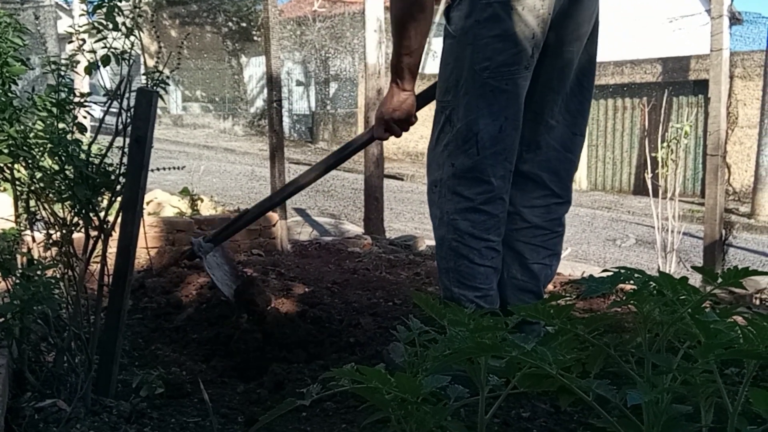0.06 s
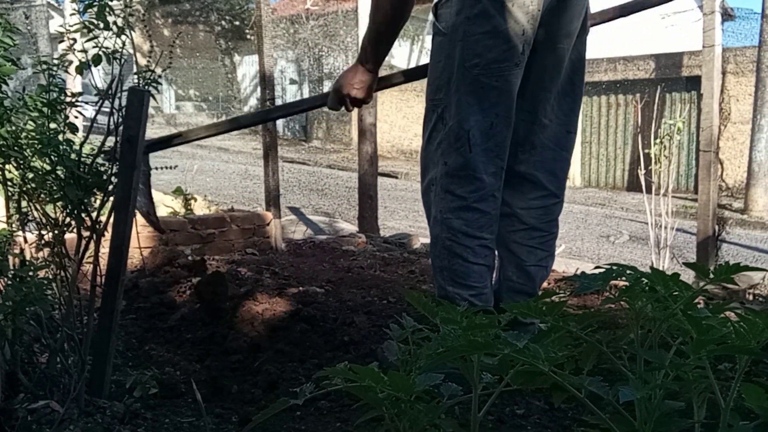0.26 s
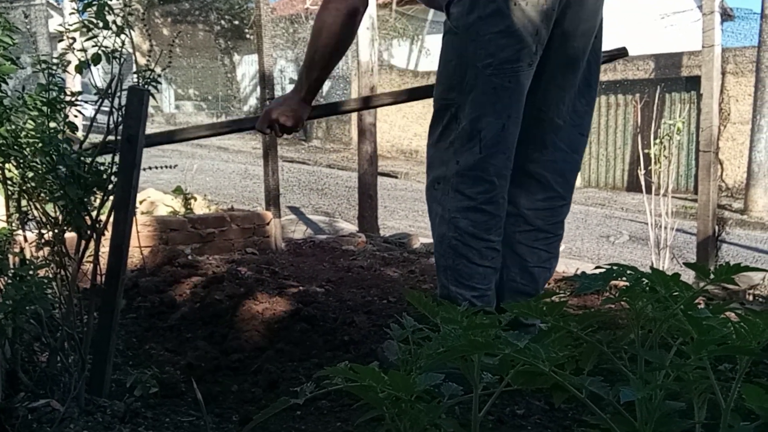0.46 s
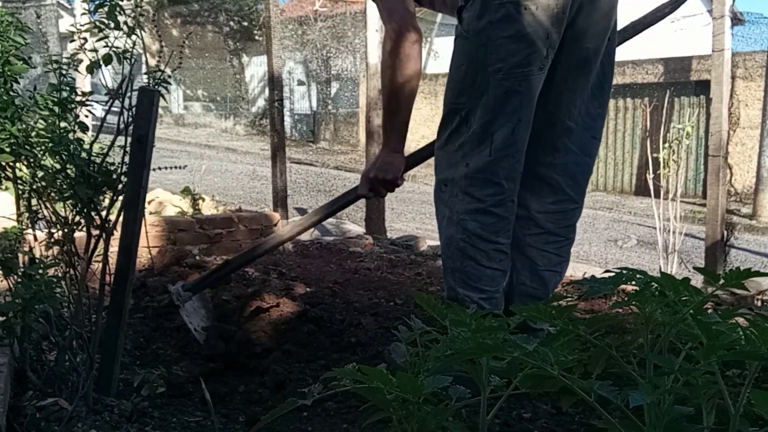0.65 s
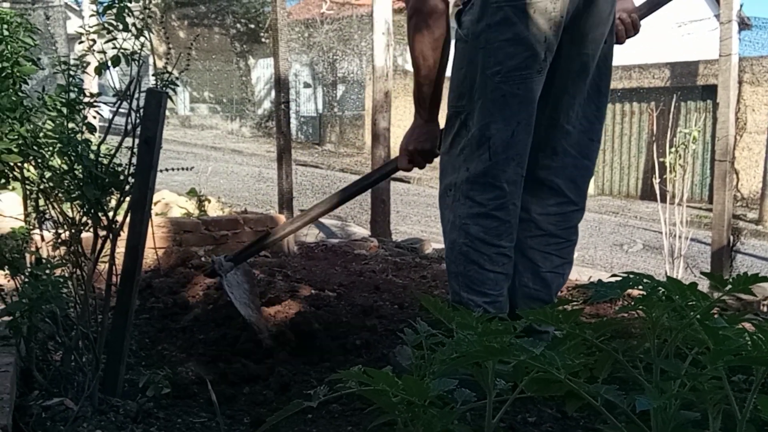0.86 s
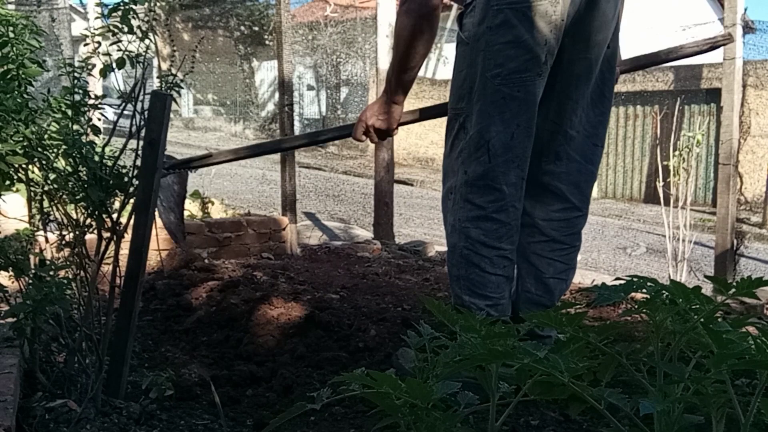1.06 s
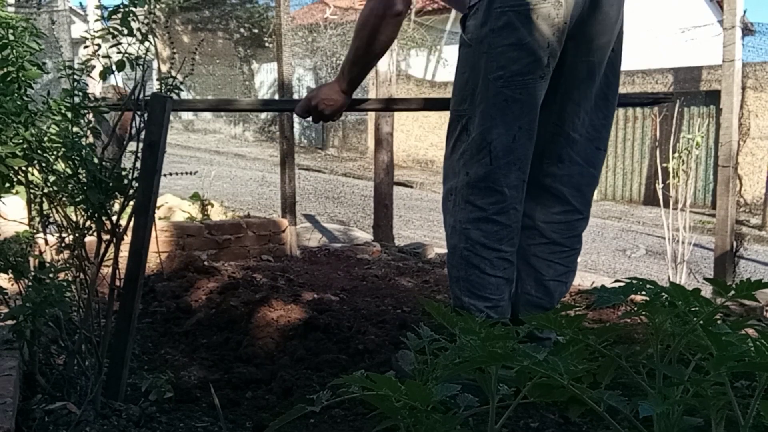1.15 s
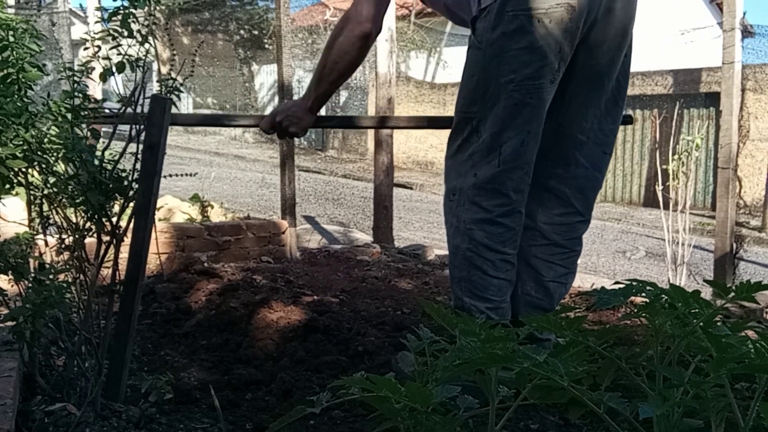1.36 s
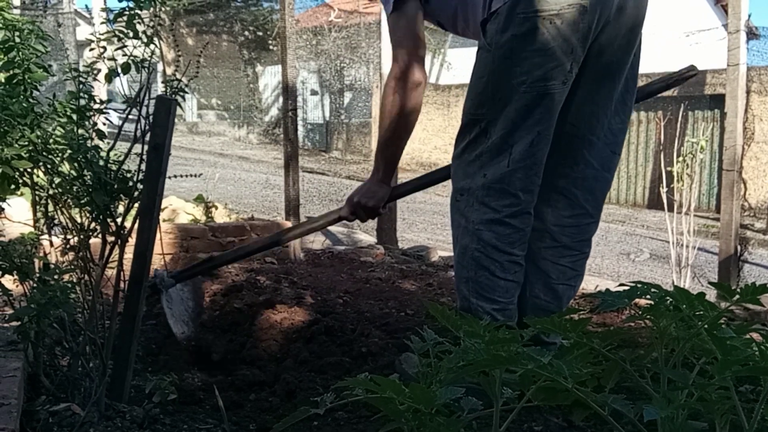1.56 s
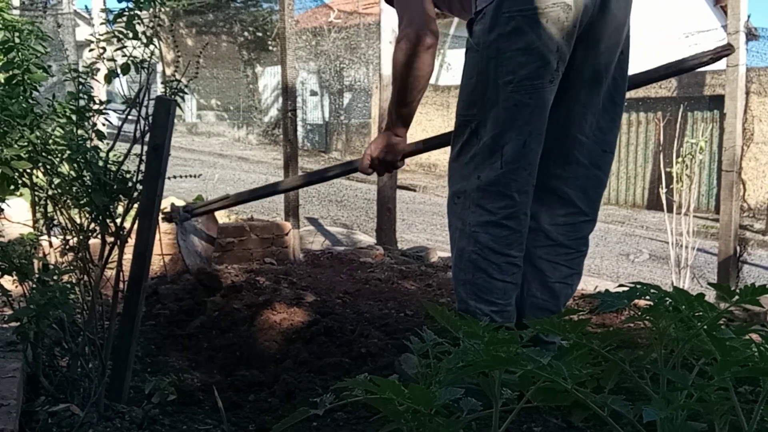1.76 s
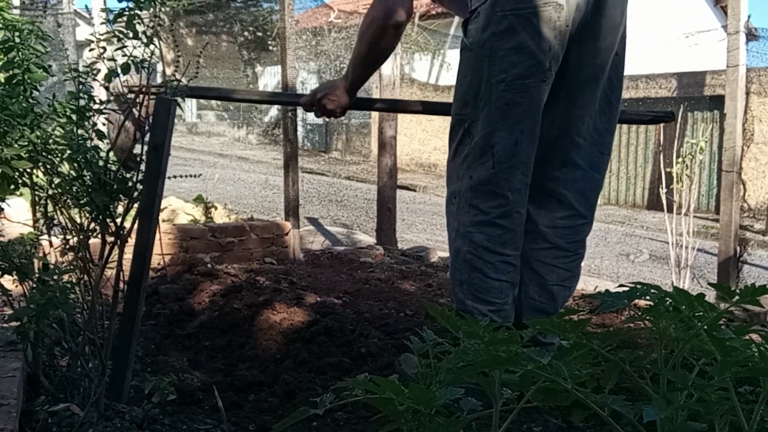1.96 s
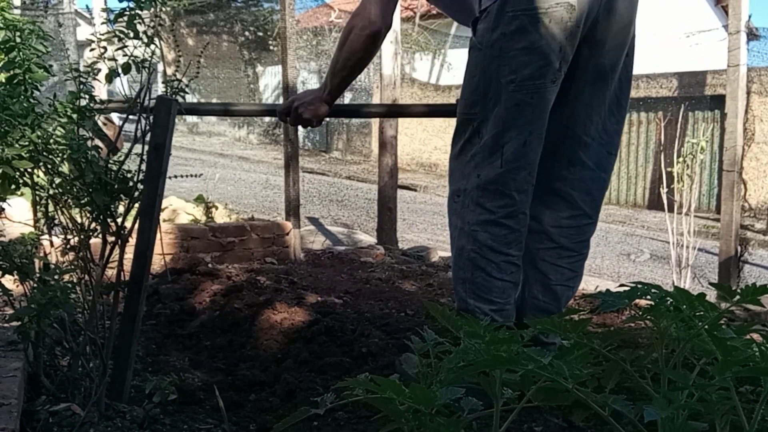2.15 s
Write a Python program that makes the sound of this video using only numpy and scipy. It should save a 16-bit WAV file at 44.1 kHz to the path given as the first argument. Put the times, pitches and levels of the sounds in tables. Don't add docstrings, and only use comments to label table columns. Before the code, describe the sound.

Close outdoor stereo of a steel hoe striking moist earth three times at a steady pace; stones click on metal, soil patters back, hands slide on wood, and low distant traffic rumbles quietly behind.

```python
import sys
import numpy as np
from scipy import signal
from scipy.fft import rfft, irfft
from scipy.io import wavfile
from scipy.ndimage import uniform_filter1d

SR = 44100
rng = np.random.default_rng(int(sys.argv[2]) if len(sys.argv) > 2 else 0)


def int16_out(signal):
    q = np.round(np.clip(np.atleast_2d(signal).T, -1, 1) * 32767)
    wavfile.write(sys.argv[1], SR, q.astype(np.int16))


def voltage_ratio(level):
    return 10 ** (np.asarray(level, float) / 20)


N = 97020
T = np.arange(N) / SR

# time in seconds, level in dB.
CHOP_FORCE = [
    [(.218, -53), (.224, -25), (.231, -31), (.2335, -17), (.248, -29.5), (.253, -27), (.257, -22.5),
     (.268, -37.5), (.31, -57)],
    [(1.0772, -55), (1.0788, -18.5), (1.087, -27), (1.098, -25), (1.112, -37.5), (1.13, -44.5), (1.16, -57),
     (1.2, -77)],
    [(1.9254, -26), (1.9268, -24.5), (1.938, -29), (1.943, -37), (1.958, -37.5), (1.962, -35.5),
     (1.972, -48), (2.0, -56.5)],
]
EARTH_WEIGHT_DB = [-0.5, 2.5, -2]
BLADE_RING_DB = [-13, -11.5, -23]
# frequency in Hz, level in dB.
GRIT_TONE = [(300, -30), (1500, -16.5), (3300, -12.5), (5300, -8), (6800, -2.5), (8600, -8.5), (13600, -29),
             (15200, -14)]
EARTH_TONE = [(150, -40), (300, -18), (500, -9.5), (1000, -4.5), (1500, -1), (2300, 0.5), (3500, -0.5),
              (6000, -22)]
# frequency in Hz, width in Hz, level in dB.
BLADE_MODES = [(2300, 350, -11.5), (3390, 300, -5), (3850, 290, -15), (4630, 530, -11), (6600, 400, -0.5),
               (7225, 500, -2), (8000, 720, -4.5), (10600, 700, -10)]
# start in seconds, hold in seconds, level in dB, fade in dB per second,
# dull clods in dB relative to the fine crumbs.
CRUMB_FALLS = [(-.02, 0.088, -68, 161, -4.5), (0.229, 0.01, -31, 119, -8), (0.435, 0.04, -56, 200, -36),
               (1.116, 0.01, -43, 169, -10), (1.244, 0.047, -67.5, 310.5, -11),
               (1.478, 0.22, -70, 209, -11), (1.872, 0.036, -61, 456, -2.5),
               (1.949, 0.088, -58.5, 128, -29), (2.118, 0.018, -64, 214, -14.5)]
# frequency in Hz, level in dB.
CRUMB_TONE = [(600, -21), (1500, -9.5), (2500, 1.5), (4500, -1), (7500, 1.5), (9300, -13.5), (13600, -33),
              (15300, -30)]
# start in seconds, peak in dB, pitch in Hz.
STONE_TICKS = [(0.231, -22.5, 6600), (0.2324, -14.5, 6270), (.2337, -12.5, 7900), (0.2322, -16.5, 4900),
               (0.239, -18.5, 6200), (.2400, -18, 4850), (.2440, -20.5, 7050), (0.2555, -18.5, 6640),
               (0.2637, -25, 7200), (0.278, -27.5, 6400), (0.44, -43, 4400), (.4595, -38, 4900),
               (.4610, -40, 7000), (.4640, -48, 9500), (.4670, -42, 5800), (0.479, -45, 2540),
               (0.509, -46, 5500), (.5180, -48.5, 6900), (1.0786, -16, 6600), (1.0843, -17, 6860),
               (1.0863, -12.5, 7100), (1.0920, -19, 3240), (1.0968, -15.5, 6480), (1.8850, -46.5, 7560),
               (1.9257, -15, 6890), (1.9303, -11.5, 7230), (1.9341, -12.5, 7560), (1.9263, -19, 9910),
               (1.937, -27, 6360), (1.9600, -39, 10280), (1.9620, -28, 7600), (2.0750, -56.5, 5920),
               (2.1240, -51, 9200), (1.8770, -50, 6000)]
# start in seconds, peak in dB, pitch in Hz, 60 dB decay in seconds.
CLOD_KNOCKS = [(.240, -42.5, 241, 0.081), (.286, -33, 2120, 0.038), (.29, -52, 410, 0.76),
               (.592, -42.5, 232, 0.064), (.598, -54, 330, .05), (.597, -54.5, 745, 0.056),
               (.596, -48.5, 1047, 0.049), (.609, -48, 1080, .03), (.609, -56, 600, .03),
               (.63, -61, 1000, .05), (.617, -59, 1880, 0.049), (1.082, -35, 267, 0.09),
               (1.095, -39, 340, 0.12), (1.082, -36, 1030, .07), (1.144, -37.5, 1410, 0.089),
               (1.146, -39.5, 2300, 0.03), (1.884, -55, 2190, 0.07), (1.886, -52, 3450, .07),
               (1.928, -35, 1004, 0.058), (1.935, -38.5, 531, 0.064), (1.936, -44, 950, .03),
               (1.927, -37, 750, .06), (.274, -40, 1500, 0.026), (1.93, -42.5, 320, 0.086),
               (1.95, -34.5, 181, 0.051), (1.94, -29, 225, 0.06), (1.962, -37, 116, 0.1),
               (2.124, -48.5, 2420, 0.092), (2.1235, -32.5, 6500, 0.01), (2.1245, -39, 4400, 0.025),
               (.29, -50, 1350, .3)]
# start in seconds, length in seconds, level in dB, thin top band in dB.
HAND_SLIDES = [(0.026, 0.21, -52, -14), (0.586, 0.22, -53, -11), (1.535, 0.07, -60, -16),
               (1.75, 0.052, -65, -14), (2.125, 0.09, -57, -19.5)]
# frequency in Hz, width in Hz, level in dB.
HANDLE_BANDS = [(4270, 350, -2), (3900, 400, -9), (4950, 500, -16)]
# start in seconds, length in seconds, frequency in Hz,
# width in Hz, level in dB.
GRIP_SQUEAKS = [(.12, .08, 2800, 200, -66), (.71, .04, 2750, 200, -68), (.742, .04, 2780, 280, -58),
                (.742, .035, 2430, 200, -64), (.55, .05, 1700, 200, -67), (.74, .04, 3500, 500, -63),
                (.26, .135, 6800, 1200, -44), (.43, .11, 4000, 700, -56), (1.265, .07, 3300, 300, -59),
                (1.26, .08, 7150, 250, -64), (1.255, .085, 4300, 900, -58), (1.26, .05, 5900, 500, -65),
                (1.16, .06, 1550, 200, -60), (1.31, .04, 2200, 200, -66), (1.58, .12, 5100, 300, -71),
                (2.0, .09, 4550, 250, -65), (1.99, .06, 2950, 250, -65)]
# start in seconds, length in seconds, from Hz, to Hz, level in dB.
BIRD_WHISTLES = [(.70, .14, 6900, 7480, -75), (.895, .095, 7950, 7100, -76), (.985, .09, 6750, 5900, -73),
                 (1.0, .07, 6200, 5200, -78)]
# start in seconds, length in seconds, from Hz, to Hz, level in dB.
ENGINE_BOOMS = [(0.022, .11, 68, 82.5, -50.5), (0.363, 0.15, 84, 91.5, -47.5),
                (0.464, 0.075, 65, 64.6, -51.5), (0.525, 0.094, 95, 95, -53.5),
                (0.667, 0.056, 72, 65.4, -56.5), (0.924, .07, 84, 84, -53.5), (1.083, 0.073, 68, 67.4, -61),
                (1.235, 0.057, 68, 68, -58), (1.686, 0.064, 113, 126, -54.5), (1.707, 0.092, 84, 72, -50.5),
                (1.83, 0.09, 74, 91.3, -52), (2.142, 0.053, 80, 80.5, -51.5)]
# frequency in Hz, level in dB.
TOWN_TONE = [(25, -34.5), (45, -29), (65, 4), (120, -8), (160, -12.5), (260, -16.5), (400, -34),
             (1200, -55)]
AIR_TONE = [(120, -21.5), (300, -1), (1700, -5.5), (4500, -17.5), (7500, -20), (9300, -33.5), (13700, -38),
            (15300, -19)]
# time in seconds, level in dB.
TOWN_SWELL = [(0.0, -57.5), (0.16, -61.5), (0.45, -54.5), (0.84, -61), (1.14, -56.5), (1.42, -62),
              (1.8, -56.5), (2.02, -61.5), (2.2, -58)]
# frequency in Hz, share from 0 to 1.
MIC_LIKENESS = [(60, 1), (200, 0.36), (1000, 0.45), (8000, 0.12)]
# frequency in Hz, level in dB.
RIGHT_MIC_TONE = [(60, -3.5), (300, -3.5), (1300, -5), (2400, -10.5), (5000, -2), (8000, -12.5), (10500, 6),
                  (15000, -1.5)]

LEFT_LAG, FLOOR_LAG = 47, 19


def evened(x):
    return x / np.sqrt(np.mean(x ** 2) + 1e-20)


def drift(noise, *sizes_axes):
    for size, axis in sizes_axes:
        noise = uniform_filter1d(noise, size=size, axis=axis)
    return evened(noise)


def read(points, hz):
    f, value = np.transpose(points)
    return np.interp(np.log(hz + 1), np.log(f + 1), value)


def colour(x, points):
    log_gain = np.log(voltage_ratio(read(points, abs(np.fft.fftfreq(2048, 1 / SR)))))
    taps = np.fft.ifft(np.exp(np.conj(signal.hilbert(log_gain)))).real[:1024]
    return signal.oaconvolve(x, taps[None] / np.linalg.norm(taps), axes=1)[:, :N]


def resonate(x, hz, width, order=1):
    turn = np.exp(2j * np.pi * np.cumsum(hz * np.ones(x.shape[-1])) / SR)
    r = np.exp(-np.pi * width / SR)
    low = signal.lfilter([np.sqrt(2 - 2 * r * r)], [1, -r], x / turn)
    for _ in range(order - 1):
        low = signal.lfilter([np.sqrt(2) * (1 - r)], [1, -r], low)
    return (turn * low).real


def grains(per_s, spread_db):
    shared = 0.65
    size = voltage_ratio(spread_db * np.minimum(rng.exponential(1, N), 4)) * (rng.random(N) < per_s / SR)
    a, b = rng.standard_normal((2, N))
    return evened(size * np.array([a, shared * a + np.sqrt(1 - shared ** 2) * b]))


def add(mix, s, sound):
    part = mix[round(s * SR):][:len(sound)]
    part += sound[:len(part)]


def chops():
    earth_db, earth_lag_s = -6, 0.0037
    force = [np.interp(T, *np.transpose(c), left=-150, right=-150) for c in CHOP_FORCE]
    cracks = grains(18000, 1.6)
    grit = cracks * voltage_ratio(force).sum(0)
    struck = cracks * sum(voltage_ratio(f + db) for f, db in zip(force, BLADE_RING_DB))
    ring = sum(voltage_ratio(db) * resonate(struck, hz, w, order=2) for hz, w, db in BLADE_MODES)
    push = sum(voltage_ratio(f + db) for f, db in zip(force, EARTH_WEIGHT_DB))
    push = signal.lfilter([1], [1, -np.exp(-1 / (earth_lag_s * SR))], push) / (earth_lag_s * SR)
    earth = colour(push * grains(2300, 1.2), EARTH_TONE)
    return colour(grit, GRIT_TONE) + ring + voltage_ratio(earth_db) * earth


def crumbs():
    rise, clump_db, patch_db = 0.3, 1.4, 2.2
    fine = clods = 0
    for s, hold, db, fade, clod_db in CRUMB_FALLS:
        level = np.clip((T - s) / (rise * hold), 0, 1) * voltage_ratio(db - fade * np.maximum(T - s - hold, 0))
        fine, clods = fine + level, clods + voltage_ratio(clod_db) * level
    clumps = drift(rng.standard_normal(N), (200, 0), (200, 0))
    fine = fine * voltage_ratio(clump_db * clumps) * grains(12000, 2.1)
    patter = colour(fine, CRUMB_TONE) + colour(clods * grains(5000, 2.1), EARTH_TONE)
    z = signal.stft(patter, nperseg=256, noverlap=192)[2]
    patches = drift(rng.standard_normal(z.shape[1:]), (4, 0), (10, 1))
    return signal.istft(z * voltage_ratio(patch_db * patches), nperseg=256, noverlap=192)[1][:, :N]


def stones():
    decay_s, rattle_level, rattle_width_hz = 0.0012, 0.4, 1800
    out, t = np.zeros(N), np.arange(400) / SR
    for s, db, hz in STONE_TICKS:
        rattle = rattle_level * resonate(rng.standard_normal(400), hz, rattle_width_hz, order=2)
        add(out, s, voltage_ratio(db) * np.exp(-t / decay_s) * (np.sin(2 * np.pi * hz * t) + rattle))
    return out


def knocks():
    rise_turns, roughness = 1.5, 0.6
    out, t = np.zeros(N), np.arange(6000) / SR
    for s, db, hz, t60 in CLOD_KNOCKS:
        wobble = resonate(rng.standard_normal(6000), hz, min(hz / 3, 500), order=2)
        tone = np.sin(2 * np.pi * hz * t) + roughness * wobble
        add(out, s, np.minimum(t * hz / rise_turns, 1) * voltage_ratio(db - 60 * t / t60) * tone)
    return out


def slides(rub):
    edge_s, sag_share, wobble_db, top_hz, top_fade_db = 0.025, 0.05, 2, 6080, -22
    sag = 1 - sag_share * sum(np.clip((T - s) / length, 0, 1) * (T < s + length)
                              for s, length, _, _ in HAND_SLIDES)
    body = sum(voltage_ratio(db) * resonate(rub, hz * sag, w, order=2) for hz, w, db in HANDLE_BANDS)
    top, out = resonate(rub, top_hz * sag, 300, order=2), 0
    for s, length, db, top_db in HAND_SLIDES:
        gate = np.clip(np.minimum(T - s, (s + length - T) / 2) / edge_s, 0, 1)
        top_gain = voltage_ratio(top_db + top_fade_db * np.clip((T - s) / length, 0, 1) ** 2)
        out = out + voltage_ratio(db) * gate * (body + top_gain * top)
    return out * voltage_ratio(wobble_db * drift(rng.standard_normal(N), (600, 0), (600, 0)))


def squeaks(rub):
    out = 0
    for s, length, hz, w, db in GRIP_SQUEAKS:
        swell = np.sin(np.pi * np.clip((T - s) / length, 0, 1))
        out = out + voltage_ratio(db) * swell * resonate(rub, hz, w, order=2)
    return out


def hands():
    rub = grains(9000, 1.5)
    return slides(rub) + squeaks(rub)


def garden(x):
    echo_db, yard_t60, near_db = -9, 0.05, 1.5
    t = np.arange(2000) / SR
    taps = rng.standard_normal((2, 2000)) * (rng.random((2, 2000)) < .06) * voltage_ratio(-60 * t / yard_t60)
    taps *= voltage_ratio(echo_db) / np.linalg.norm(taps, axis=1, keepdims=True)
    taps[:, 0] = 1
    left, right = signal.oaconvolve(x, taps, axes=1)[:, :N]
    shade = voltage_ratio(read(RIGHT_MIC_TONE, np.fft.rfftfreq(N, 1 / SR)))
    return voltage_ratio(near_db) * np.array([left, np.roll(irfft(rfft(right) * shade, N), -LEFT_LAG)])


def bird():
    out = np.zeros((2, N))
    for s, length, from_hz, to_hz, db in BIRD_WHISTLES:
        u = np.clip((T - s) / length, 0, 1)
        bend = u ** 2 if to_hz < from_hz else np.sin(2 * u)
        hz = from_hz + (to_hz - from_hz) * bend
        for side in out:
            tone = resonate(rng.standard_normal(N), hz, 210, order=2)
            side += voltage_ratio(db) * np.sin(np.pi * u) ** .5 * tone
    return out


def booms():
    right_db, out = -3, 0
    for s, length, from_hz, to_hz, db in ENGINE_BOOMS:
        u = np.clip((T - s) / length, 0, 1)
        turns = rng.random() + np.cumsum(from_hz + (to_hz - from_hz) * u) / SR
        out = out + voltage_ratio(db) * np.sqrt(2) * np.sin(np.pi * u) * np.sin(2 * np.pi * turns)
    return np.array([np.roll(out, LEFT_LAG), voltage_ratio(right_db) * out])


def wash(points, patchy_db):
    hz = np.fft.rfftfreq(1024, 1 / SR)
    a, b, c, d, patches = rng.standard_normal((N // 256 + 5, 513, 5)).T
    patches = drift(patches, (12, 0), (10, 1))
    same, left = np.clip(read(MIC_LIKENESS, hz), 0, 1)[:, None], a + 1j * b
    right = same * left + np.sqrt(1 - same ** 2) * (c + 1j * d)
    right = right * voltage_ratio(read(RIGHT_MIC_TONE, hz))[:, None]
    z = np.array([left * np.exp(-2j * np.pi * hz * FLOOR_LAG / SR)[:, None], right])
    z = z * voltage_ratio(read(points, hz)[:, None] + patchy_db * patches)
    return evened(signal.istft(z, nperseg=1024, noverlap=768)[1][:, :N])


def town():
    swell_db = np.interp(T, *np.transpose(TOWN_SWELL)) + 58.5
    return voltage_ratio(-58.5) * voltage_ratio(swell_db) * wash(TOWN_TONE, patchy_db=2.0)


def air():
    return voltage_ratio(-66) * wash(AIR_TONE, patchy_db=1)


def scene():
    background = town()
    near = chops() + crumbs() + (stones() + knocks()) + hands()
    return garden(near) + bird() + background + air() + booms()


def band_limit(x):
    return signal.sosfilt(signal.butter(12, 17140, fs=SR, output="sos"), x)


def record(dry):
    low_cut_hz, edge_hz = 57, 15900
    x = signal.sosfilt(signal.butter(2, low_cut_hz, "high", fs=SR, output="sos"), dry)
    x = signal.oaconvolve(x, signal.firwin(255, edge_hz, fs=SR)[None], "same")
    return band_limit(x)


dry = scene()
out = record(dry)
int16_out(out)
```